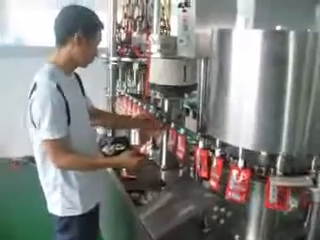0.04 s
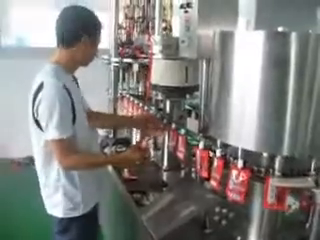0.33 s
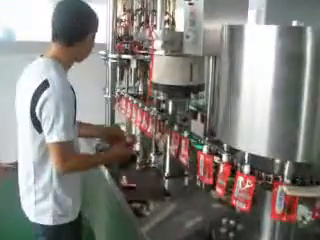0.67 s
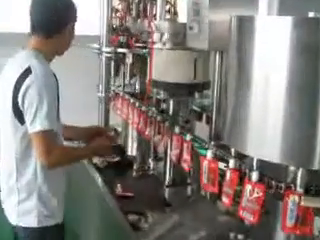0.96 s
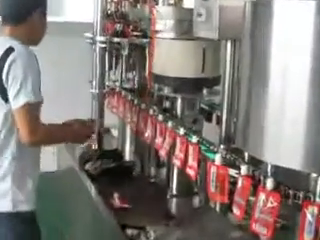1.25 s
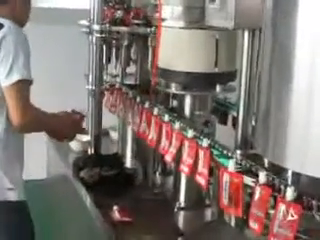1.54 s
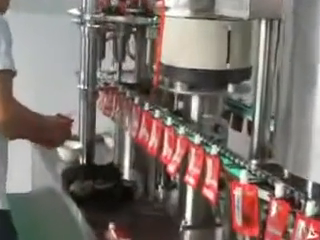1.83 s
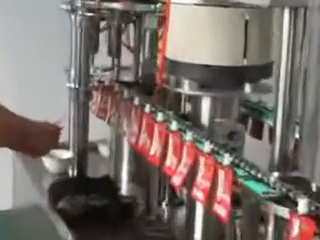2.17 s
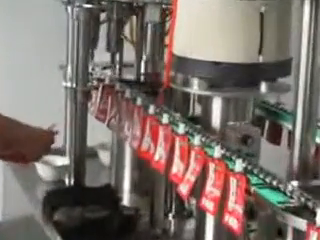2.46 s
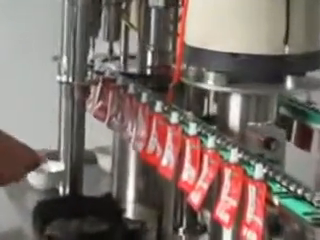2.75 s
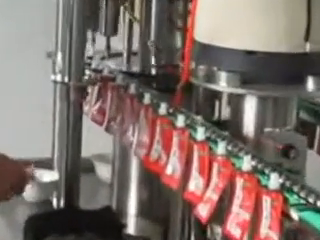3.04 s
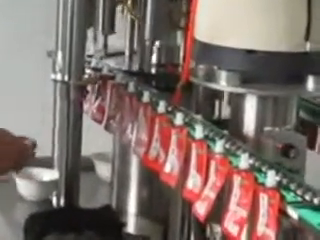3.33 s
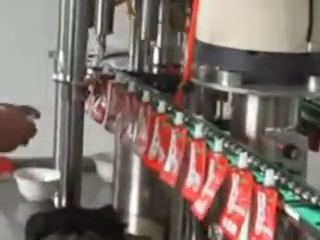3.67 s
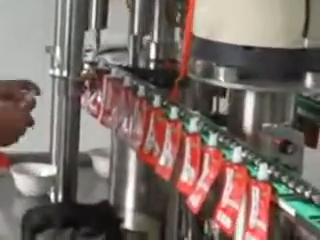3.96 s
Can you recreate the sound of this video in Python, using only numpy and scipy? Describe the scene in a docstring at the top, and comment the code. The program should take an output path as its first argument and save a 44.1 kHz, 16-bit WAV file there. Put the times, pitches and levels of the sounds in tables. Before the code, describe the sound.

A factory packaging machine runs with a steady hum, rattling clatter and light clanks.

```python
"""A factory hall, close to a pouch filling and capping line, heard in mono. A vibrating cap feeder hums at
harmonics of the mains and shakes its caps fifty times a second; their impacts clatter and excite the damped
modes of the steel bowl. A drive whines near 1.5 kHz, drives rush underneath and the conveyor clanks lightly.
After one harder knock the whole level drops and climbs back."""
import sys
import numpy as np
from scipy import signal
from scipy.fft import rfft, irfft
from scipy.io import wavfile

SR = 44100
rng = np.random.default_rng(int(sys.argv[2]) if len(sys.argv) > 2 else 0)


def bounce(signal):
    """Save signal as a 16-bit WAV file at the path given by the first command-line argument."""
    frames = np.transpose(np.atleast_2d(signal))
    limited = np.clip(frames, -1, 1)
    pcm = np.round(limited * 32767).astype(np.int16)
    wavfile.write(sys.argv[1], SR, pcm)


N = 176400
TIME = np.arange(N) / SR
MAINS_HZ = 49.97

# harmonics of the feeder's magnet (multiple of the mains, level/dB)
HUM_HARMONICS = [(2, -50.5), (3, -39), (4, -50), (5, -52), (6, -42.5), (7, -47.5), (8, -43.5), (10, -44),
                 (11, -49.5), (12, -53.5), (13, -48), (14, -52)]
# strength of the feeder's vibration (t/s, level/dB)
VIBRATION = [(0, 1.5), (.2, 1), (.29, -2), (.42, -0.5), (.67, -0.5), (.87, 1.5), (1.1, .5), (1.5, 0.5),
             (1.8, 1), (2.02, 2), (2.09, -7), (2.2, -0.5), (2.55, 0.5), (2.95, -1.5), (3.2, 1), (3.4, -.7),
             (3.62, 0.1), (4, -1)]
# envelope of the conveyor motor's note (t/s, level/dB)
MOTOR_LEVEL = [(0.0, -55), (0.05, -49), (0.65, -65), (0.86, -50), (1.35, -52), (1.45, -50), (2.43, -61.5),
               (4.0, -55)]
# spectra of the plastic caps' clatter and of the nearest caps' ticks (f/Hz, relative level/dB)
CLATTER_SPECTRUM = [(200, -31), (500, -12), (750, -1), (1200, -6.5), (1800, -3), (2500, 3.5), (2900, -6.5),
                    (3750, 0.5), (4200, -12.5), (4700, -4.5), (5200, -16), (6300, -12.5), (6800, -16),
                    (7350, -14)]
TICK_SPECTRUM = [(300, -12.5), (900, 1), (2000, 1.5), (3600, 0.5), (4600, 0.5), (6000, -9), (7400, -4.5)]
# modes of the steel bowl, and the two close lines of a drive's whine (f/Hz, bandwidth/Hz, level/dB)
BOWL_MODES = [(681, 50, -40.5), (757.5, 13, -38.5), (786.5, 13, -36), (1054, 24, -43), (2153, 26, -38.5),
              (2304, 17, -33), (2383, 20, -31), (2530, 45, -38.5), (3110, 9.7, -39), (3544, 23, -42.5),
              (3810, 20, -50), (4815, 15, -40.5), (6230, 25, -44.5)]
WHINE_LINES = [(1441.4, 24, -35), (1500, 13, -35)]
# envelope of the drive's whine (t/s, level/dB)
WHINE_LEVEL = [(0, 1), (.12, 3.5), (.33, -3), (.5, 1), (.68, -2), (1.0, 1.5), (1.1, -2), (1.2, 4.5),
               (1.3, -0.5), (1.55, 0.5), (1.92, 2.5), (2.15, -5), (2.4, -3), (2.58, 3.5), (2.9, -3),
               (4, -1)]
# spectrum of the rush of drives and hall (f/Hz, relative level/dB)
RUSH_SPECTRUM = [(20, -16), (45, -8.5), (90, -4.5), (140, -7.5), (260, -3), (420, -1), (700, 3.5),
                 (1200, 1), (2400, 8.5), (4000, -1.5), (7400, -16.5)]
# conveyor clanks: onsets (t/s, level/dB) and spectrum (f/Hz, relative level/dB)
CLANK_ONSETS = [(.59, -26), (1.062, -28), (1.548, -26), (1.656, -22.5), (2.017, -22), (2.558, -22),
                (3.549, -21), (3.635, -31), (3.876, -20)]
CLANK_SPECTRUM = [(300, -6), (900, -7), (2400, -10), (3800, -8.5), (5500, -8), (7400, -5.5)]
# low rustling swell: envelope (t/s, level/dB) and spectrum (f/Hz, relative level/dB)
SWELL_LEVEL = [(0, -59.5), (1.95, -65), (2.2, -47), (2.4, -33.5), (2.6, -39), (2.75, -45), (3.04, -38.5),
               (3.2, -44), (4, -60)]
SWELL_SPECTRUM = [(30, -22), (90, -8.5), (250, -1), (500, 0.5), (1000, -16.5), (3000, -23.5)]
# modes of the harder knock (f/Hz, level/dB)
KNOCK_MODES = [(1480, -12.5), (1700, -18), (3100, -23)]


def amp(db):
    """Amplitude ratio of a level in decibels."""
    return 10 ** (np.asarray(db) / 20)


def unit(x):
    """Normalisation to rms 1."""
    return x / np.sqrt(np.mean(x ** 2) + 1e-20)


def envelope(points):
    """Gain interpolated between (t/s, level/dB) points."""
    return amp(np.interp(TIME, *np.transpose(points)))


def add(mix, onset_s, sound):
    """Superposition of a sound from its onset."""
    part = mix[round(onset_s * SR):][:len(sound)]
    part += sound[:len(part)]


def colour(x, spectrum):
    """Minimum-phase filtering by a spectral envelope; rms 1."""
    f, db = np.transpose(spectrum)
    hz = abs(np.fft.fftfreq(4096, 1 / SR))
    log_gain = np.log(amp(np.interp(np.log(hz + 1), np.log(f + 1), db)))
    taps = np.fft.ifft(np.exp(np.conj(signal.hilbert(log_gain)))).real
    return unit(signal.fftconvolve(x, taps[:len(taps) // 2])[:len(x)])


def wander(top_hz):
    """Slow fluctuation: low-passed noise of rms 1."""
    hz = np.fft.rfftfreq(N, 1 / SR)
    lowpass = np.exp(-(hz / top_hz) ** 2) * (hz > 0)
    return unit(irfft(rfft(rng.standard_normal(N)) * lowpass, N))


def hall(x, t60_s=.5, wet_db=1):
    """Reverberation: an exponentially decaying diffuse field follows the direct sound."""
    t = np.arange(SR // 2) / SR
    tail = rng.standard_normal(len(t)) * amp(-60 * t / t60_s) * (t > .003)
    wet = signal.fftconvolve(x, tail / np.linalg.norm(tail))[:N]
    return (x + amp(wet_db) * wet) / np.hypot(1, amp(wet_db))


def feeder_hum(waver_db=1.28, waver_hz=7.5, drift_turns=.0065):
    """Forced vibration: the magnet drives the feeder at mains harmonics, each wavering slightly."""
    hum = np.zeros(N)
    for harmonic, db in HUM_HARMONICS:
        gain = amp(db + waver_db * wander(waver_hz))
        turns = round(harmonic) * MAINS_HZ * TIME + rng.random() + drift_turns * wander(waver_hz)
        hum += gain * np.sin(2 * np.pi * turns)
    return np.sqrt(2) * envelope(VIBRATION) ** .75 * hum


def conveyor_motor(hz=57):
    """Simple harmonic motion: the motor's low note swells and fades."""
    return np.sqrt(2) * envelope(MOTOR_LEVEL) * np.sin(2 * np.pi * hz * TIME)


def landings(per_s, spread_db, focus):
    """Modulated Poisson process: uneven impacts bunch at one phase of each shake of the bowl."""
    chance = np.exp(focus * np.cos(2 * np.pi * (MAINS_HZ * TIME + .17)))
    size = amp(spread_db * np.minimum(rng.exponential(1, N), 4)) * rng.choice([-1, 1], N)
    return size * (rng.random(N) < per_s / SR * chance / chance.mean())


def caps():
    """Impact noise: many caps merge into a reverberant clatter, while the nearest tick dryly."""
    all_hits = landings(per_s=2200, spread_db=4, focus=.8)
    clatter = amp(-27) * hall(colour(all_hits, CLATTER_SPECTRUM))
    near_hits = landings(per_s=280, spread_db=5, focus=.62)
    ticks = amp(-36.5) * colour(near_hits, TICK_SPECTRUM)
    flicker = amp(1.2 * wander(top_hz=35))
    return envelope(VIBRATION) ** .49 * flicker * (clatter + ticks)


def steel(modes):
    """Resonance: the heavier landings excite each damped mode of a steel part."""
    ringing = np.zeros(N)
    for hz, width_hz, db in modes:
        hits = landings(per_s=520, spread_db=2, focus=1.6)
        radius = np.exp(-np.pi * width_hz / SR)
        feedback = [1, -2 * radius * np.cos(2 * np.pi * hz / SR), radius ** 2]
        ringing += amp(db) * unit(signal.lfilter([1, 0, -1], feedback, hits))
    return ringing


def drives():
    """Broadband noise: the drives rush at a slightly fluctuating level."""
    return amp(-27.5 + .75 * wander(top_hz=24)) * colour(rng.standard_normal(N), RUSH_SPECTRUM)


def conveyor_clanks(t60_s=.059):
    """Transient excitation: bright, quickly damped noise bursts reverberate in the hall."""
    clanks, t = np.zeros(N), np.arange(SR // 5) / SR
    for onset_s, db in CLANK_ONSETS:
        burst = colour(rng.standard_normal(len(t)), CLANK_SPECTRUM)
        add(clanks, onset_s, amp(db - 60 * t / t60_s) * burst)
    return hall(clanks)


def rustle():
    """Amplitude modulation: low noise swells and subsides."""
    return envelope(SWELL_LEVEL) * colour(rng.standard_normal(N), SWELL_SPECTRUM)


def knock(onset_s=2.6025, t60_s=.051):
    """Free vibration: after one harder blow, three modes decay exponentially."""
    ringing, t = np.zeros(N), np.arange(SR // 5) / SR
    for hz, db in KNOCK_MODES:
        add(ringing, onset_s, amp(db - 60 * t / t60_s) * np.sin(2 * np.pi * hz * t))
    return ringing


def level_drop(onset_s=2.6075, depth_db=18, fall_s=.0058, hold_s=.05, recovery_db_per_s=46):
    """Attenuation: the level falls abruptly, holds, and climbs back linearly in decibels."""
    fall = np.clip((TIME - onset_s) / fall_s, 0, 1)
    recovered_db = recovery_db_per_s * np.maximum(TIME - onset_s - hold_s, 0)
    return amp(-fall * np.maximum(depth_db - recovered_db, 0))


def scene():
    """Superposition of all sources, the same in both channels."""
    line = feeder_hum() + conveyor_motor() + caps()
    line += envelope(VIBRATION) * steel(BOWL_MODES) + envelope(WHINE_LEVEL) * steel(WHINE_LINES)
    line += drives() + rustle() + conveyor_clanks() + knock()
    return np.tile(level_drop() * line, (2, 1))


def record(dry):
    """Soft saturation rounds the peaks; a low-pass filter then limits the band."""
    ceiling, edge_hz = .51, 7480
    taps = signal.firwin(601, edge_hz, window=("kaiser", 8), fs=SR)
    return signal.oaconvolve(ceiling * np.tanh(dry / ceiling), taps[None], "same")


dry = scene()
out = record(dry)
bounce(out)
```